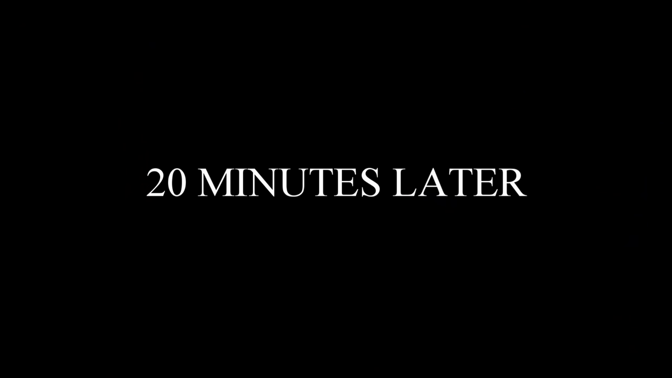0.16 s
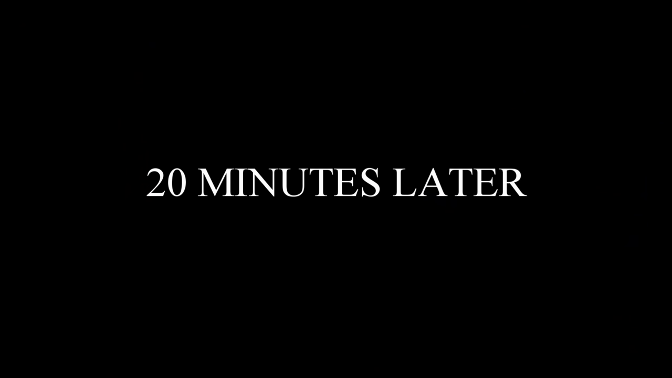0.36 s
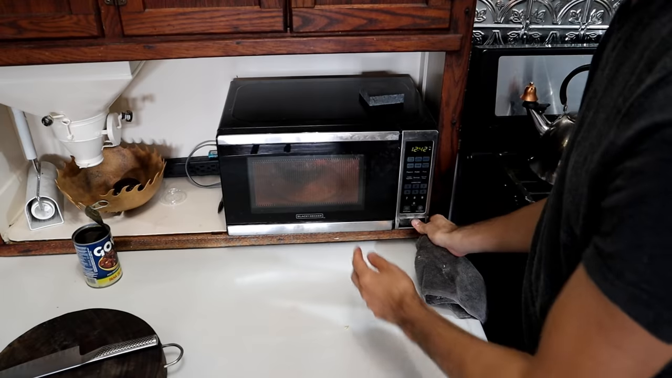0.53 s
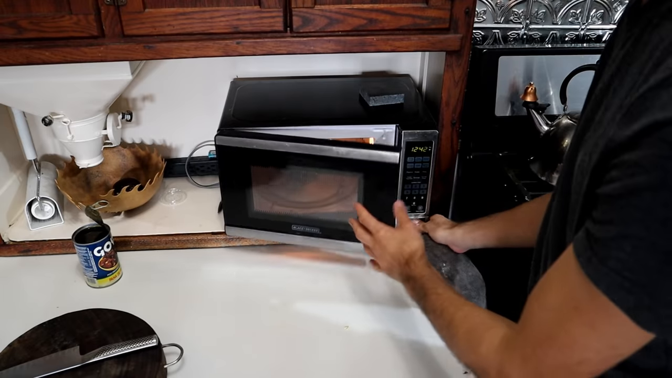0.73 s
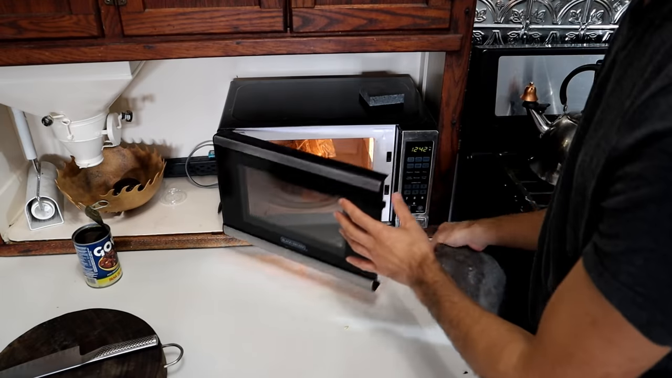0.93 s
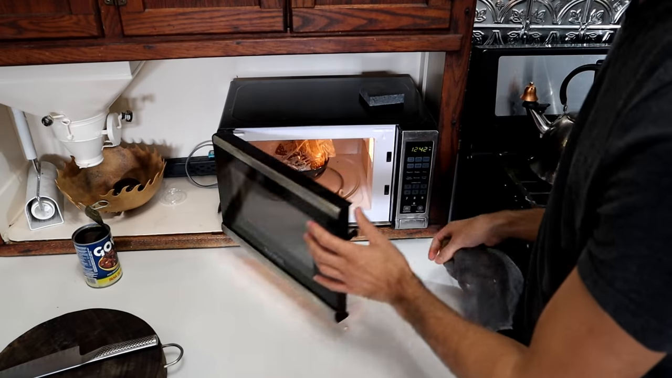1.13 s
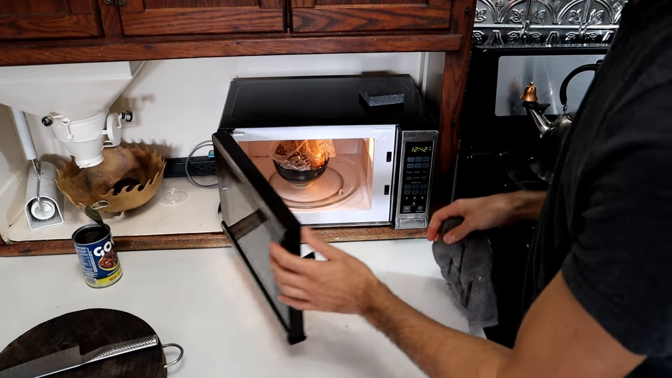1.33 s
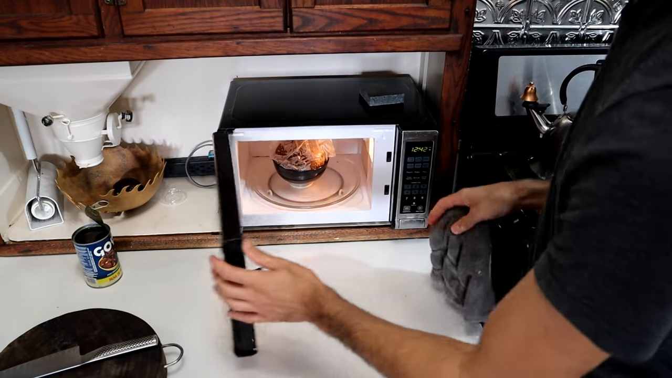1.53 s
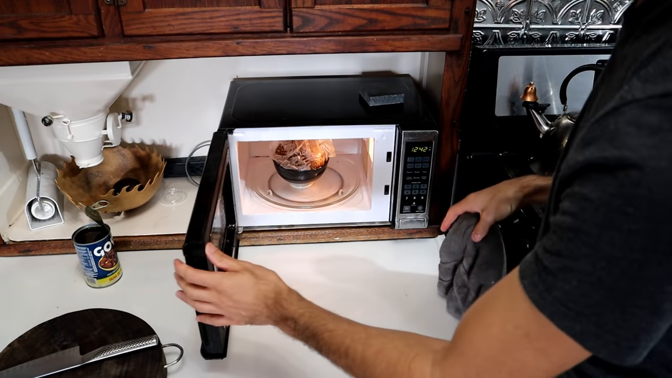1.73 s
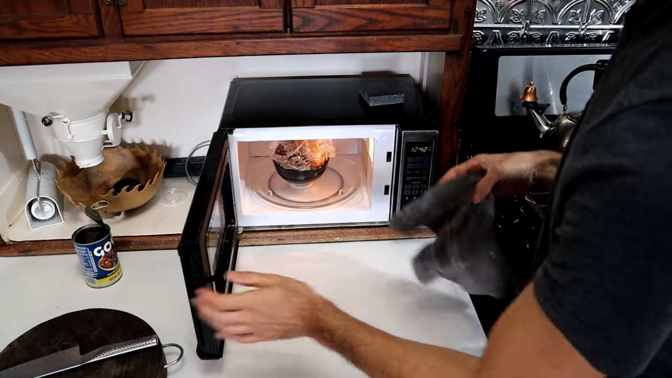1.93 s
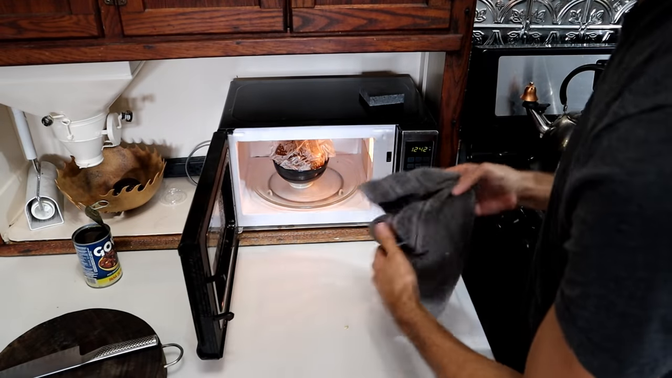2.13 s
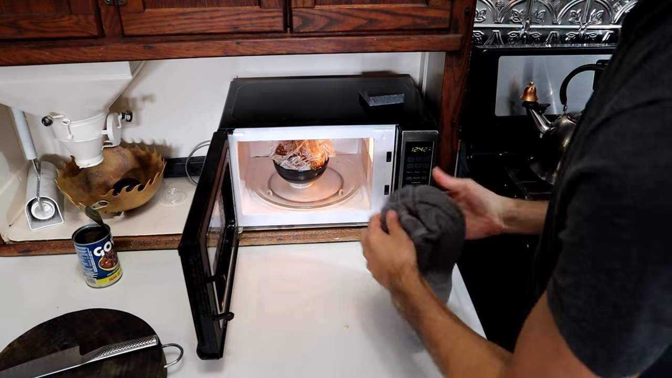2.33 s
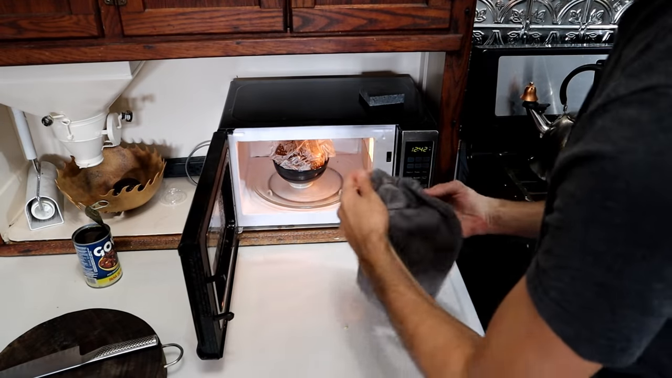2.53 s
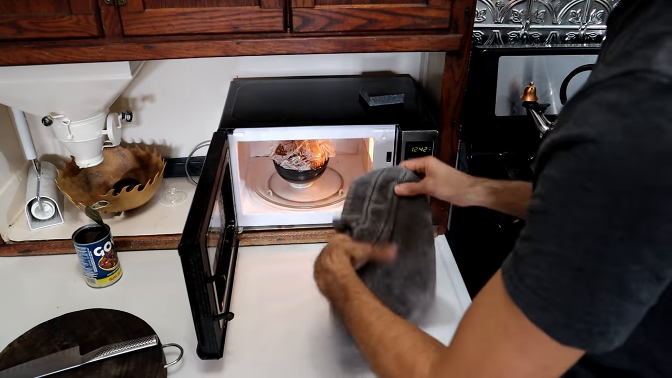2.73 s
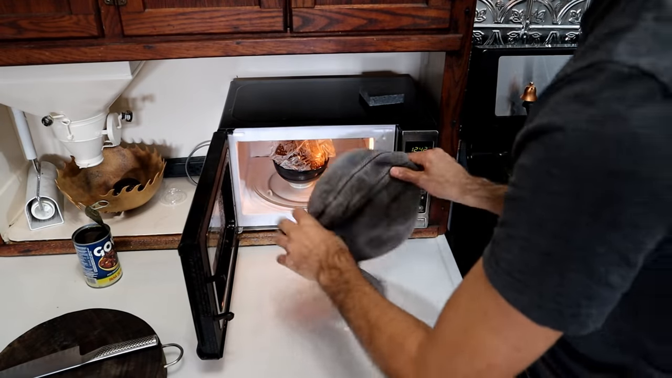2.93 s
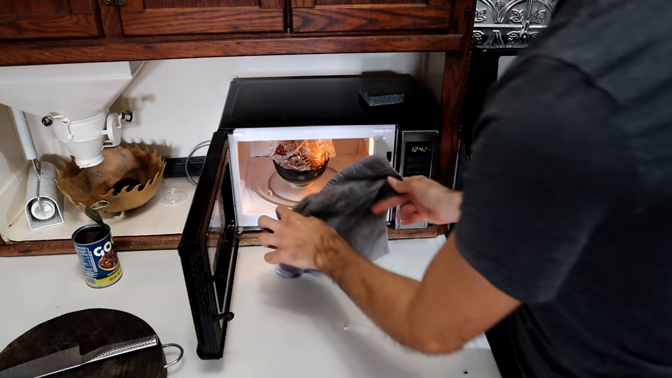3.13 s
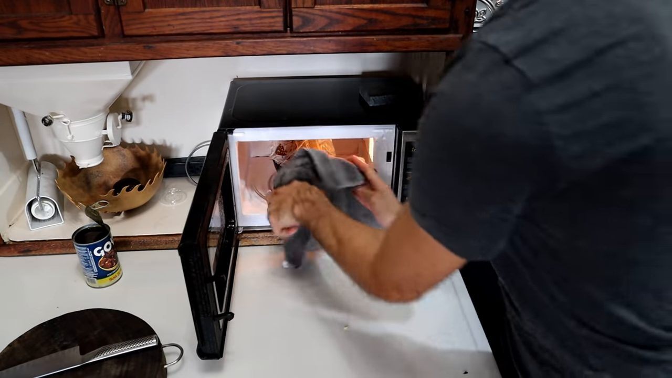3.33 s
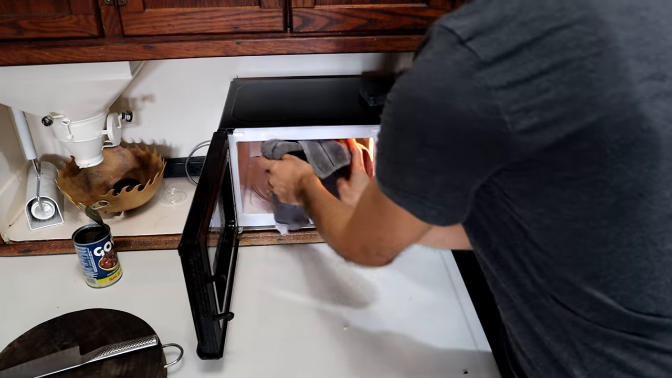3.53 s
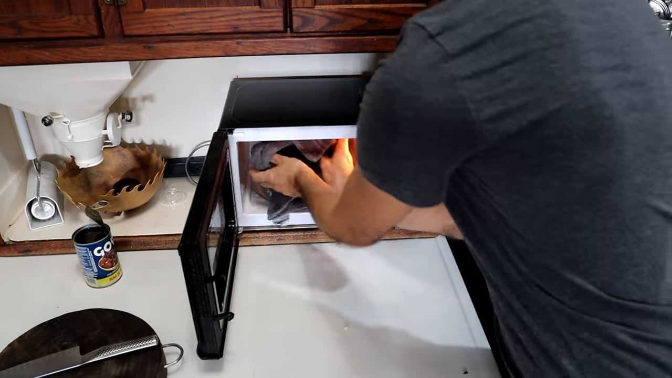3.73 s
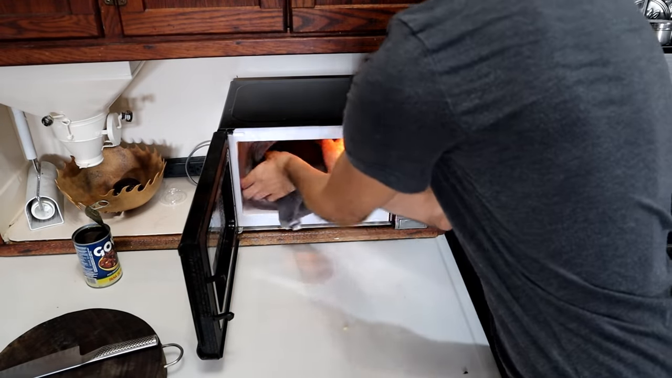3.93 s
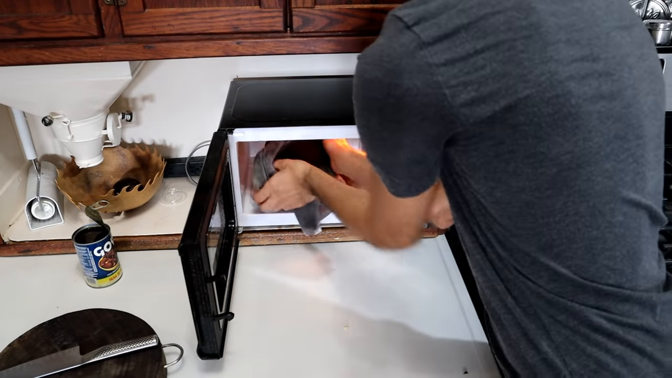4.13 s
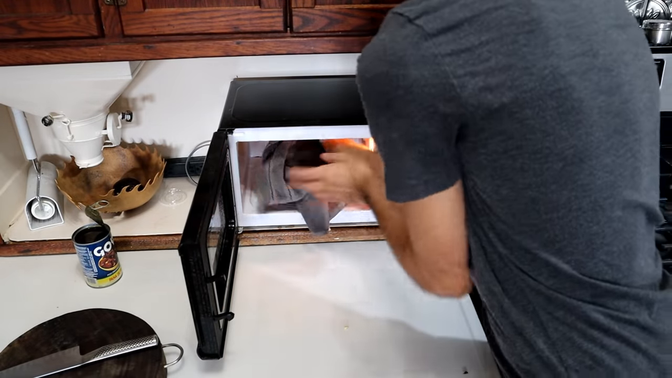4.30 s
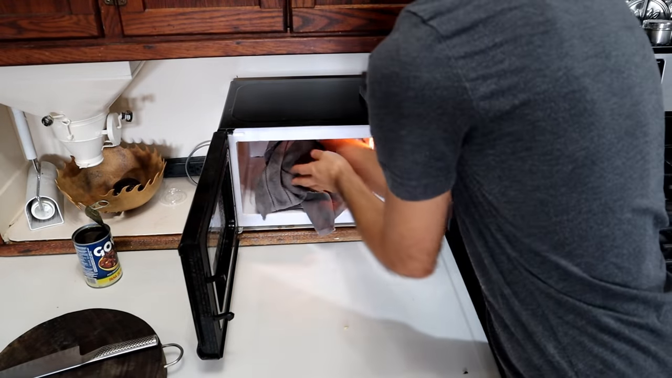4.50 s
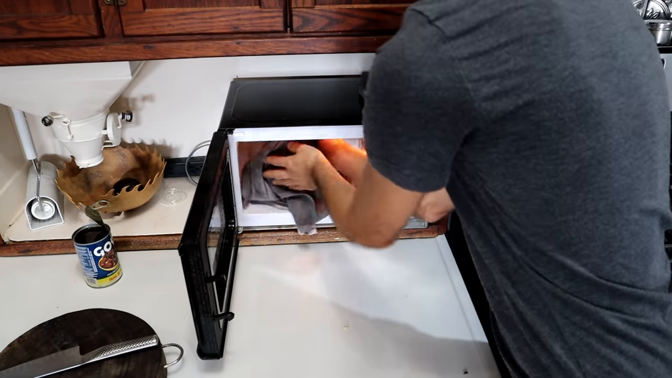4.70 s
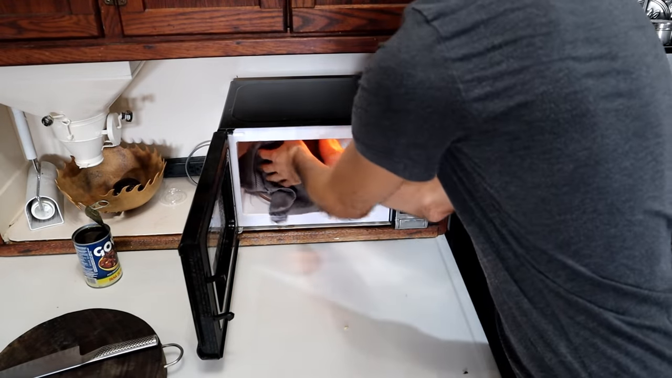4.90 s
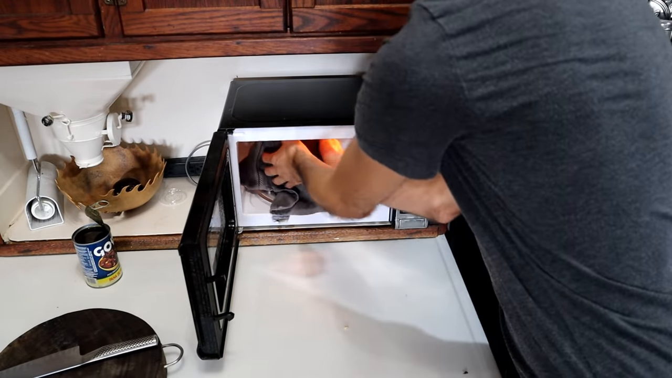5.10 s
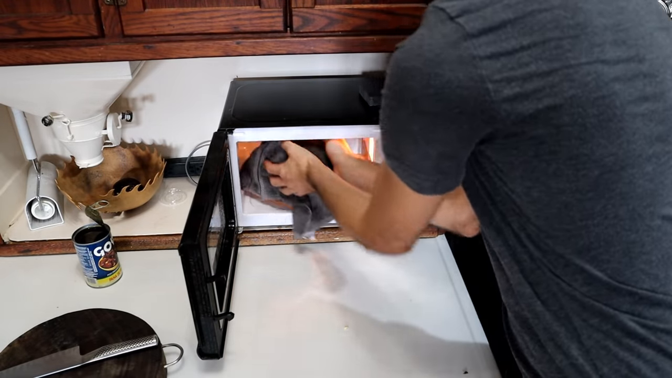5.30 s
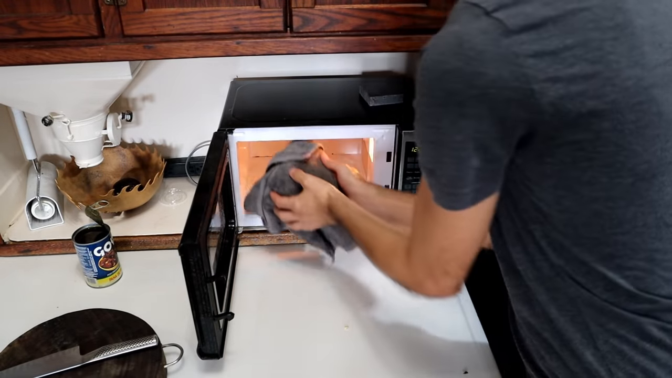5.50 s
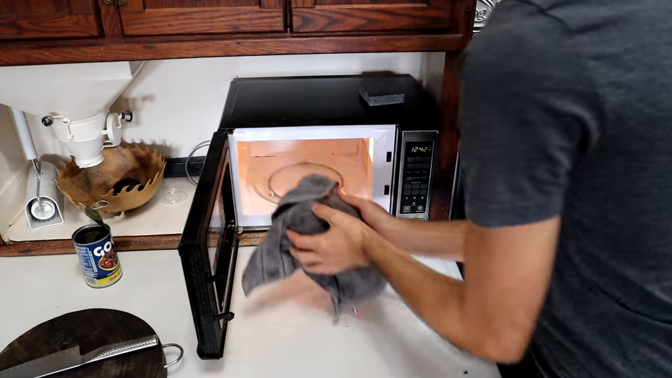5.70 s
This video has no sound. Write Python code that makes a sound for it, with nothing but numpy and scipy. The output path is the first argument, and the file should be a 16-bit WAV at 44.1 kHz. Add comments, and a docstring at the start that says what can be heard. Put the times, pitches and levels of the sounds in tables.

```python
"""After a silence a faint hum and room hiss cut in. A microwave door latch is pushed and snaps open in
a kitchen: contact bursts ring the panel, crack and thud, and a spring rings on. A towel of filtered,
uneven noise rustles and snaps, whisking once through the air. Among its later sounds a bowl knocks on
the glass tray inside the oven, as shorter, duller blows, and its rim clinks as a set of dying sines."""
import sys
import numpy as np
from scipy import signal
from scipy.fft import rfft, irfft
from scipy.io import wavfile
from scipy.ndimage import uniform_filter1d

SR = 44100
rng = np.random.default_rng(int(sys.argv[2]) if len(sys.argv) > 2 else 0)


def bounce(signal):
    """Save signal as a 16-bit WAV file at the path given by the first command-line argument."""
    frames = np.transpose(np.atleast_2d(signal))
    limited = np.clip(frames, -1, 1)
    pcm = np.round(limited * 32767).astype(np.int16)
    wavfile.write(sys.argv[1], SR, pcm)


N = 258117

RING_S = .35  # longest ring of one blow
WRAP = 512  # samples trimmed from the end of a short filtered sound


def amp(db):
    """Turns dB into gain."""
    return 10 ** (np.asarray(db) / 20)


def evened(x):
    """Scales to rms 1."""
    return x / np.sqrt(np.mean(x ** 2) + 1e-20)


def levelled(db, x):
    """Sets the rms of the loudest 10 ms to db."""
    loudest = uniform_filter1d(x ** 2, size=441).max()
    return amp(db) * x / np.sqrt(loudest)


def read_spectrum(points, hz):
    """Reads a curve on a log-frequency axis."""
    point_hz, value = np.transpose(points)
    return np.interp(np.log(hz + 1), np.log(point_hz + 1), value)


def coloured(x, points):
    """Filters x by a spectrum in dB."""
    gain = amp(read_spectrum(points, np.fft.rfftfreq(len(x), 1 / SR)))
    return irfft(rfft(x) * gain, len(x))


def tilted(points, tilt_db):
    """Tips a spectrum about 6 kHz by a number of dB per octave."""
    return [(hz, db + tilt_db * np.log2(hz / 6000)) for hz, db in points]


def add(mix, start_s, sound):
    """Mixes a sound in at its start time."""
    part = mix[round(start_s * SR):][:len(sound)]
    part += sound[:len(part)]


def ring(modes, seconds, spread_db=0.):
    """Sums dying sines; each blow lands elsewhere and favours other modes."""
    hz, db, t60 = np.transpose(modes)[:, :, None]
    t = np.arange(round(seconds * SR)) / SR
    place = rng.standard_normal((len(modes), 1))
    envelope = amp(db + spread_db * place - 60 * t / np.maximum(t60, .01))
    return (envelope * np.sin(2 * np.pi * hz * t)).sum(0)


def burst(seconds):
    """A rough contact: noise that swells quickly and dies away."""
    t = np.arange(4096) / SR
    seconds = max(seconds, .0003)
    swell = np.minimum(t / (0.3 * seconds), 1)
    return rng.standard_normal(len(t)) * np.exp(-t / seconds) * swell


def blow(body_db, crack_db, thud_db, favoured_hz, thud_hz, usual_s, tilt_db, modes,
         dense_db, dense_t60, tick_db):
    """One blow: the body rings, the contact cracks, the cabinet thuds."""
    # low modes of the oven cabinet: pitch_hz, relative level_db, t60_s
    cabinet_modes = [(89, 5, .24), (125.2, -1, .13), (145, -2, .12), (166.8, 1, .13), (198.3, 5, .1),
                     (258, 0, .1)]
    # spectrum of the contact crack before its tilt: pitch_hz, relative level_db (per Hz)
    crack_spectrum = [(800, -11), (2000, 1), (3200, 5), (4500, 8), (8800, -5.5), (12000, -9), (16000, -26)]
    # a harder, shorter contact favours a higher pitch; the usual contact favours 786 Hz
    contact_s = usual_s * (786 / favoured_hz) ** 0.7
    force = burst(contact_s)
    strong = ring(modes, RING_S, spread_db=2.5)
    # countless weak modes between the strong ones merge into a dying noise
    t = np.arange(len(strong)) / SR
    dense = rng.standard_normal(len(strong)) * amp(dense_db - 60 * t / dense_t60)
    dense[0] = amp(tick_db)  # the contact itself is heard first
    # where the blow lands decides which pitch range rings most
    favour = [(favoured_hz / 6, -15.), (favoured_hz / 3.0, -8.), (favoured_hz / 1.25, -5.),
              (favoured_hz, 0), (favoured_hz * 1.15, -6.), (favoured_hz * 4, -16.),
              (favoured_hz * 12, -45.)]
    body = coloured(signal.fftconvolve(force, strong + dense), favour)[:-WRAP]

    crack = coloured(burst(1.63 * contact_s), tilted(crack_spectrum, tilt_db))[:-WRAP]

    # cabinet modes weaken with their distance in octaves from the thud pitch
    near_pitch = [(hz, db - 10.3 * abs(np.log2(hz / thud_hz)), t60) for hz, db, t60 in cabinet_modes]
    thud = signal.fftconvolve(burst(1.32 * contact_s), ring(near_pitch, RING_S, spread_db=0.95))
    return levelled(body_db, body), levelled(crack_db, crack), levelled(thud_db, thud)


def hum():
    """Wide hiss with narrow wavering hum bands standing out of it."""
    # hiss spectrum: pitch_hz, relative level_db (per Hz)
    hiss_spectrum = [(12, -44), (20, -32), (55, -4), (86, -8), (114, 2), (173, -15.5), (223, -0.5),
                     (257, -8), (330, -10), (648, -18.5), (1040, -18.5), (1170, -23), (5160, -31),
                     (15000, -44), (16300, -61)]
    # hum bands: pitch_hz, width_hz, level_db (relative to the hiss)
    hum_bands = [(60, 9.3, -24.5), (99, 9.6, -19), (122, 5.4, -20), (157.4, 2.8, -21.5), (225.8, 1.77, -6),
                 (329.8, 21, -17.5), (578, 11, -17.5)]
    # level that carries hiss and hum together: time_s, level_db
    room_level = [(.5, -48), (1., -46), (1.5, -48), (2.498, -48.5), (3.5, -47.5), (4.5, -49), (5.3, -47),
                  (5.85, -48.5)]
    hz = np.fft.rfftfreq(N, 1 / SR)
    white = rfft(rng.standard_normal((2, N)))
    hiss = evened(amp(read_spectrum(hiss_spectrum, hz))) * white[0]
    bands = sum(amp(db) * evened(1 / (1 + ((hz - pitch_hz) / (width_hz / 2)) ** 2))
                for pitch_hz, width_hz, db in hum_bands)
    both = irfft(hiss + bands * white[1], N)
    time_s, level_db = np.transpose(room_level)
    return both * amp(np.interp(np.arange(N) / SR, time_s, level_db))


def kitchen(x):
    """Room reflections: sparse taps of random sign, each band dying at its own speed."""
    # decay of the kitchen: pitch_hz, t60_s
    kitchen_decay = [(100, 1), (500, 0.49), (2000, 0.36), (6000, 0.33), (14000, 0.28)]
    taps = np.zeros(SR)
    at = np.arange(200, SR - 20, 20)
    taps[at + rng.integers(0, 20, len(at))] = rng.choice([-1., 1.], len(at))
    hz, t, bands = signal.stft(taps, SR, nperseg=256)
    decay = amp(-60 * t / read_spectrum(kitchen_decay, hz)[:, None])
    tail = signal.istft(bands * decay, SR, nperseg=256)[1]
    return signal.fftconvolve(x, tail / np.linalg.norm(tail))[:N]


def towel():
    """Fibres slip in tiny uneven ticks under the hand; folds snap now and then."""
    # strength of the rubbing: time_s, rustle_db, rub_db (dull rub relative to the rustle)
    rubbing = [(1.102, -65, 2), (1.9, -61, -12), (1.97, -55.5, -7), (2.05, -61.5, 5), (2.38, -59, 5),
               (2.48, -51.5, 7.5), (2.57, -55.5, 2.5), (2.63, -50.5, 1), (2.75, -56, 3), (2.89, -49.5, 2),
               (3.12, -50, -9), (3.19, -59, 4), (3.25, -50.5, -5), (3.37, -50.5, -6), (3.53, -62, 1.5),
               (3.9, -48, -2.5), (4.07, -48.5, 9), (4.14, -55, 4.5), (4.55, -53, 0.5), (4.6, -51.5, -1),
               (4.94, -49, -4), (5.0, -51.5, 1), (5.13, -50.5, -9), (5.37, -63, -7), (5.4, -45, -14),
               (5.44, -48.5, 3), (5.53, -56, 11), (5.85, -55, -5)]
    # snaps of the folds: start_s, level_db, length_s (decay time of the burst)
    fold_snaps = [(2.26, -56, .002), (2.872, -41, 0.007), (3.0072, -29, 0.012), (3.224, -47, 0.0091),
                  (3.456, -52, 0.002), (3.49, -43, 0.0011), (3.837, -47.5, .004), (4.17, -51, 0.0017),
                  (4.368, -49.5, 0.0032), (4.404, -45.5, 0.0022), (4.577, -41.5, 0.0013),
                  (4.925, -42, 0.00084), (5.294, -49, 0.0016), (5.415, -52, 0.0055), (5.731, -46, 0.0052),
                  (5.777, -50, .003), (5.822, -47, 0.0027)]
    # spectra of rustle, dull rub, airy swish and untilted snap: pitch_hz, relative level_db (per Hz)
    rustle_spectrum = [(900, -39), (2000, -2.5), (4500, 0.5), (7300, -2), (10500, -12), (16000, -27)]
    rub_spectrum = [(200, 13), (500, 9), (1500, 7), (4000, -11), (9000, -18)]
    swish_spectrum = [(4000, -11), (8000, 0), (11000, 1), (14000, -1), (16000, -6)]
    snap_spectrum = [(900, -41), (2000, -11), (4500, -6), (7300, 3.5), (10500, 5), (16000, 3.5)]
    scuff_s, scuff_db = .012, 2.2  # the rubbing catches and lets go in short scuffs
    whisk_s, whisk_db, whisk_width_s = 3.245, 19.5, 0.058  # one whisk through the air swells the swish
    swish_db = -8  # relative to the rustle, outside the whisk
    usual_snap_s, usual_tilt_db = 0.0023, -8  # a usual snap and its tilt per octave
    brighter_db = 1.5  # tilt per octave gained by a snap that lasts twice as long

    time_s, rustle_db, rub_db = np.transpose(rubbing)
    t = np.arange(N) / SR
    # the ticks change strength every 88 samples
    uneven = np.repeat(rng.standard_normal((3, N // 88 + 1)), repeats=88, axis=1)[:, :N]
    steps = np.arange(0, t[-1] + scuff_s, scuff_s)
    scuffs = np.interp(t, steps, np.minimum(rng.exponential(1, len(steps)), 3))
    slips = rng.standard_normal((3, N)) * amp(2.5 * uneven + scuff_db * scuffs)

    rustle = evened(coloured(slips[0], rustle_spectrum))
    rub = evened(coloured(slips[1], rub_spectrum)) * amp(np.interp(t, time_s, rub_db))
    swell_db = whisk_db * np.exp(-((t - whisk_s) / whisk_width_s) ** 2)
    swish = evened(coloured(slips[2], swish_spectrum)) * amp(swish_db + swell_db)
    out = (rustle + rub + swish) * amp(np.interp(t, time_s, rustle_db, left=-120))

    for start_s, level_db, length_s in fold_snaps:
        tilt_db = usual_tilt_db + brighter_db * np.log2(length_s / usual_snap_s)
        snap = coloured(burst(length_s), tilted(snap_spectrum, tilt_db))[:-WRAP]
        add(out, start_s, levelled(level_db, snap))
    return out


def bowl():
    """Hands and bowl knock the tray; a few touches make the bowl's rim clink."""
    # soft knocks at the oven and on its tray: start_s, tray_db, crack_db, thud_db, favoured_hz
    knocks = [(2.254, -44.5, -57, -42, 486), (2.449, -43.5, -52, -59, 832), (2.678, -51, -68, -63, 1110),
              (3.175, -43, -53, -46, 1550), (3.196, -38, -65, -41, 760), (3.951, -29.5, -38.5, -32.5, 726),
              (3.976, -36, -63, -28, 850), (4.025, -37, -41, -33, 694), (4.037, -30.5, -34.5, -42, 870),
              (4.046, -36, -46, -26, 865), (4.082, -28, -29.5, -31, 1720), (4.092, -33.5, -52, -31.5, 438),
              (4.123, -56, -48, -52, 598), (4.157, -62, -48, -55, 455), (4.257, -42, -46, -48, 1110),
              (4.442, -43, -45.5, -38, 706), (4.509, -37.5, -66, -37.5, 710), (4.959, -60, -43, -36, 598),
              (4.98, -39, -63, -28.5, 432), (5.007, -34, -39.5, -52, 1010), (5.018, -27.5, -38, -49, 870),
              (5.047, -34, -29.5, -45, 2060), (5.068, -26, -40, -28.5, 686),
              (5.081, -28.5, -27.5, -49, 675), (5.101, -38, -59, -27, 504), (5.124, -36.5, -48, -33, 500),
              (5.454, -37.5, -67, -36.5, 859), (5.474, -37.5, -67, -59, 860), (5.504, -44, -55, -61, 890),
              (5.594, -42.5, -46, -51, 840), (5.633, -33.5, -33, -36.5, 690), (5.648, -41, -51, -28, 790),
              (5.68, -45, -58, -38.5, 490)]
    # modes of the glass tray in the oven cavity: pitch_hz, relative level_db, t60_s
    tray_modes = [(454.6, 7, .06), (574.7, 11, .06), (717, 17, .04), (862.6, 15, .035), (1054, 11, .03),
                  (1249, 9, .04), (1495, 4, .035), (1993, 4, .045), (2320, 7, .035), (2820, 11, .04),
                  (3760, 8, .04), (4610, -2, .04), (5300, -6, .04)]
    # touches of the bowl rim: start_s, level_db, contact_s (decay time of the burst)
    rim_clinks = [(4.082, -28, .003), (4.091, -34, .002), (5.457, -45, .015), (5.503, -47, .008)]
    # modes of the bowl: pitch_hz, relative level_db, t60_s
    bowl_modes = [(2040, -7, .16), (2500, -4, .035), (3128, -10, .08), (3235, -9, .2), (3284, -2, .26),
                  (3340, -8, .1), (3410, 3, .045), (3520, -3, .035)]
    usual_thud_db, usual_thud_hz = -40.5, 171
    deeper_db = 21.5  # a knock thuds an octave deeper for each such step up in thud level
    out = np.zeros(N)
    for start_s, tray_db, crack_db, thud_db, favoured_hz in knocks:
        thud_hz = usual_thud_hz * 2 ** ((usual_thud_db - thud_db) / deeper_db)
        for part in blow(tray_db, crack_db, thud_db, favoured_hz, thud_hz,
                         usual_s=0.0073, tilt_db=-10.5, modes=tray_modes,
                         dense_db=24.5, dense_t60=0.057, tick_db=31.5):
            add(out, start_s, part)
    for start_s, level_db, contact_s in rim_clinks:
        clink = signal.fftconvolve(burst(contact_s), ring(bowl_modes, RING_S))
        add(out, start_s, levelled(level_db, clink))
    return out


def door():
    """The latch clatters, the door jumps open and bounces; a spring hums on."""
    # latch and door blows: start_s, panel_db, crack_db, thud_db, favoured_hz, thud_hz
    latch_blows = [(0.636, -33.5, -54, -36, 1030, 215), (.649, -31.5, -61, -47, 393, 260),
                   (0.662, -39, -53, -28, 739, 141), (.682, -28, -30.5, -35, 1410, 144),
                   (.729, -10, -22, -28, 600, 200), (.746, -8, -15.5, -14, 1460, 197),
                   (.757, -13, -40, -10.5, 530, 200), (.766, -13, -44, -15.5, 820, 164),
                   (0.778, -13, -22, -11, 1270, 129), (.789, -26, -50, -16.5, 519, 90),
                   (0.8, -44, -51, -13, 1280, 109), (.815, -48, -50, -14.5, 441, 88),
                   (.861, -30, -43, -17.5, 910, 154), (0.887, -59, -46, -37, 447, 191),
                   (.921, -32.5, -47, -28, 1020, 110), (.944, -25.5, -38, -31.5, 915, 100),
                   (.974, -13.5, -24, -18.5, 864, 212), (.979, -15.5, -27, -26, 1300, 186),
                   (0.999, -22, -46, -23.5, 800, 200), (1.03, -28.5, -58, -41, 806, 110)]
    # modes of door panel and latch: pitch_hz, relative level_db, t60_s
    door_modes = [(330, -3, .1), (476, 0, .09), (528, 0, .07), (734, -1, .08), (867, -1, .09),
                  (1075, -2, .07), (1175, -4, .07), (1322, 0, .09), (1418, -2, .07), (1590, -3, .07),
                  (1658, -4, .07), (1760, -3, .06), (2051, -5, .09), (2215, -5, .07), (2772, -6, .07),
                  (3230, -7, .06), (4090, -7, .06), (4380, -7, .06), (4815, -7, .06)]
    # modes that ring on after the door springs back: pitch_hz, level_db, t60_s
    spring_modes = [(935, -48, 1.1), (960, -43, 1.5), (990, -45, 1.1), (1035, -47, 1.3)]
    out = np.zeros(N)
    for start_s, *levels_and_pitches in latch_blows:
        for part in blow(*levels_and_pitches, usual_s=0.0045, tilt_db=4.5, modes=door_modes,
                         dense_db=17.5, dense_t60=0.12, tick_db=15.0):
            add(out, start_s, part)
    add(out, .98, ring(spring_modes, 4 * RING_S))
    return out


def scene():
    """Mixes near sounds and their reflections, thins their bass, and lays the hum under them."""
    # bass roll-off for near sounds: pitch_hz, gain_db
    bass_rolloff = [(20, -19), (50, -60), (75, -9), (120, -2.5)]
    latch, inside, cloth = door(), bowl(), towel()
    to_kitchen = amp(-12.5) * latch + amp(-11.0) * inside + amp(-13.0) * cloth
    near = latch + inside + cloth + kitchen(to_kitchen)
    return (coloured(near, bass_rolloff) + hum())[None]


def record(dry):
    """The sound cuts in after a silence; the loudest peaks are rounded off; then the band limit."""
    start_s, fade_s, edge_hz = .523, .002, 15850
    opened = dry * np.clip((np.arange(N) / SR - start_s) / fade_s, 0, 1)
    rounded = opened / (1 + (abs(opened) / .95) ** 4) ** .25
    lowpass = signal.firwin(511, edge_hz, window=("kaiser", 9), fs=SR)
    return signal.oaconvolve(rounded, lowpass[None], "same")


dry = scene()
out = record(dry)
bounce(out)
```